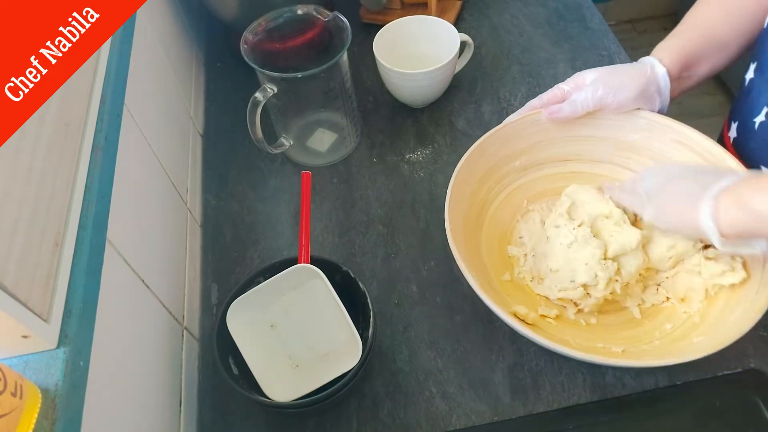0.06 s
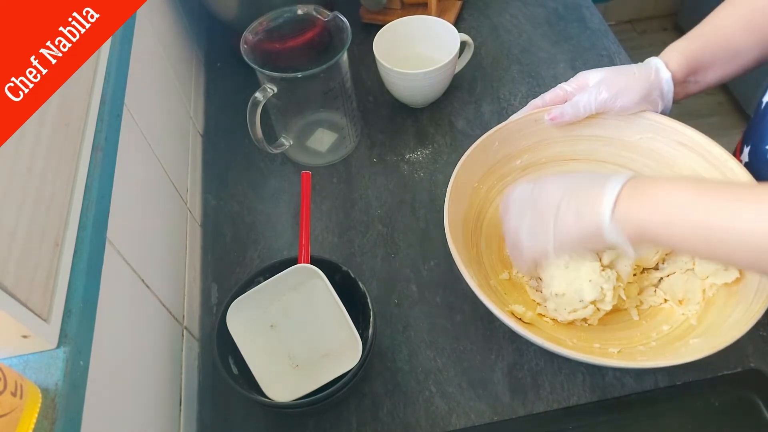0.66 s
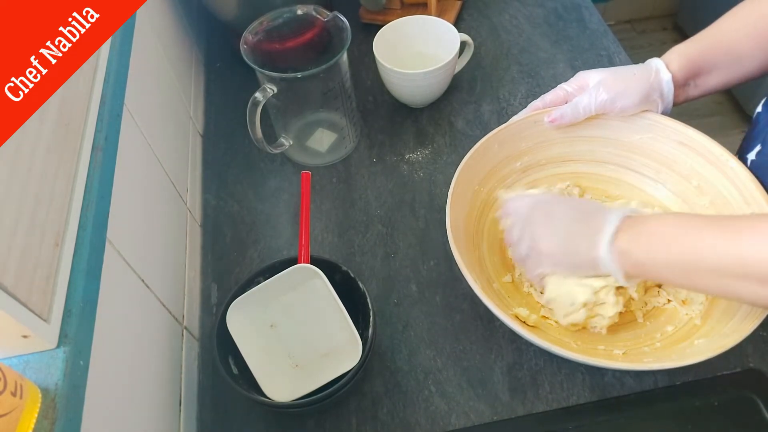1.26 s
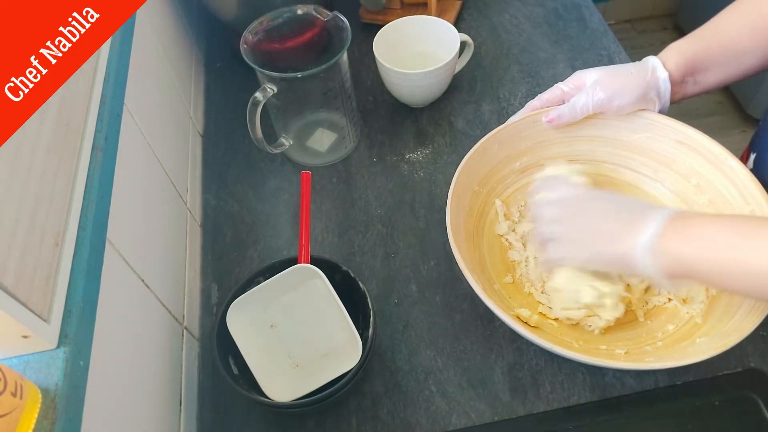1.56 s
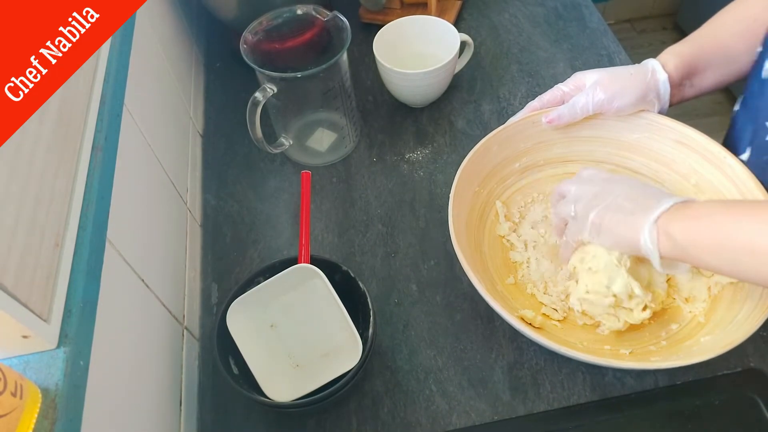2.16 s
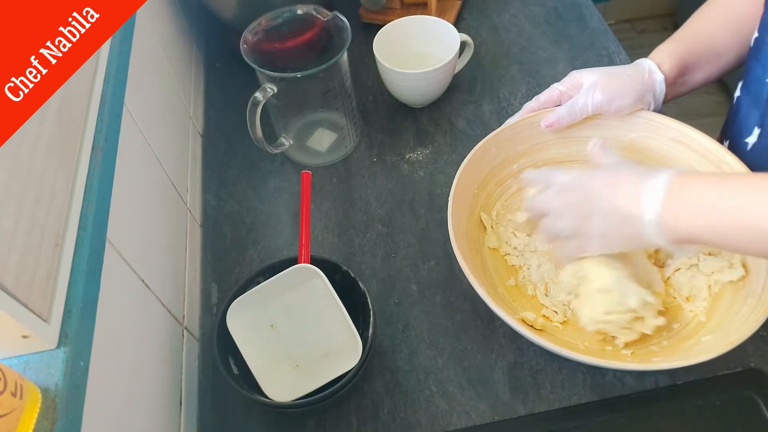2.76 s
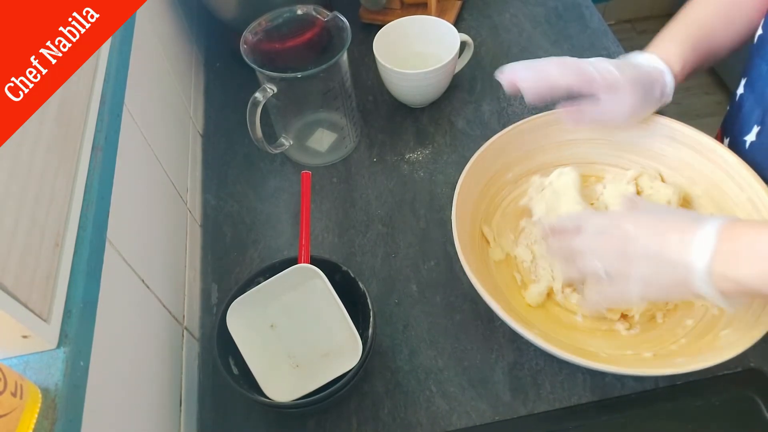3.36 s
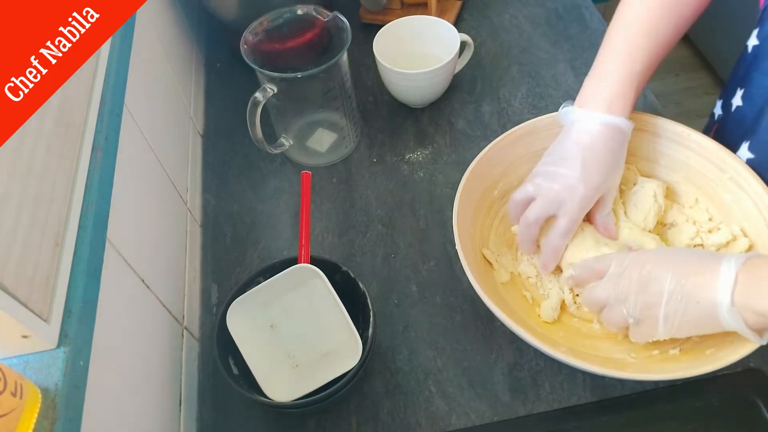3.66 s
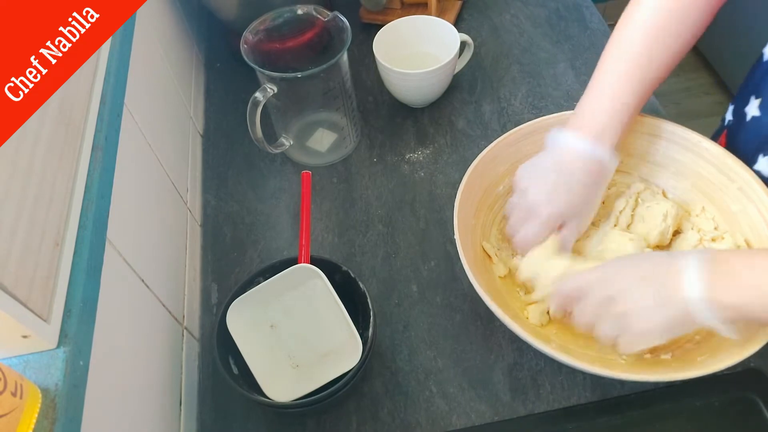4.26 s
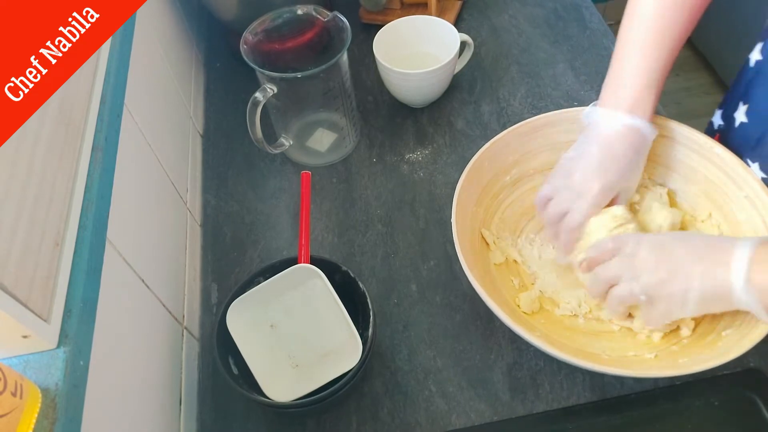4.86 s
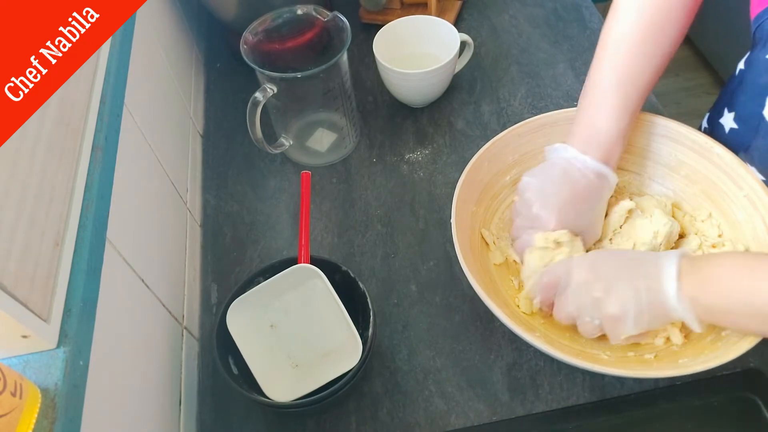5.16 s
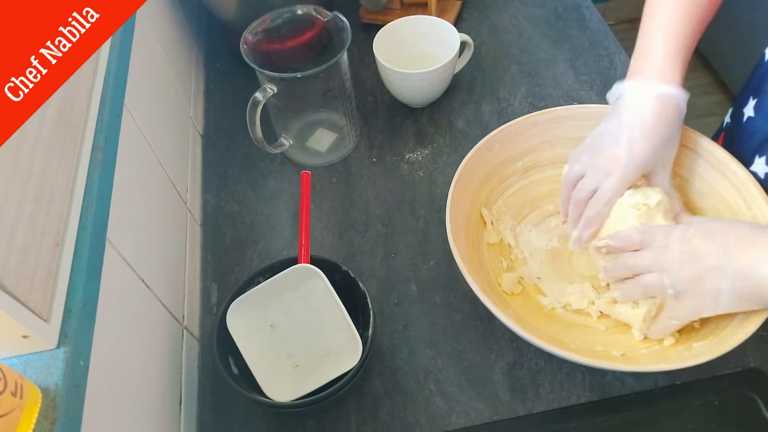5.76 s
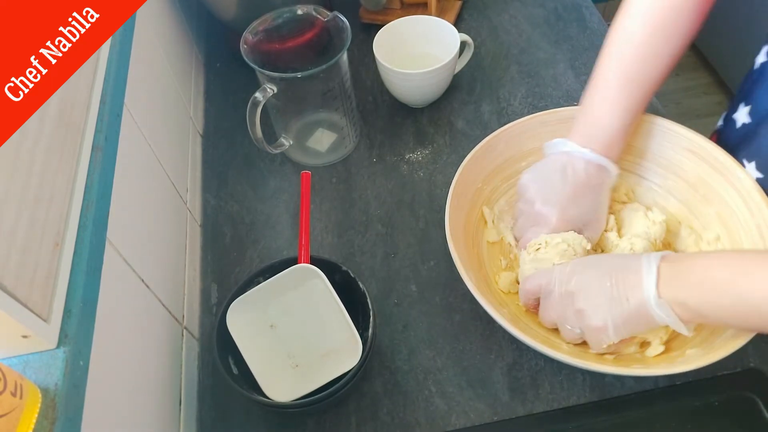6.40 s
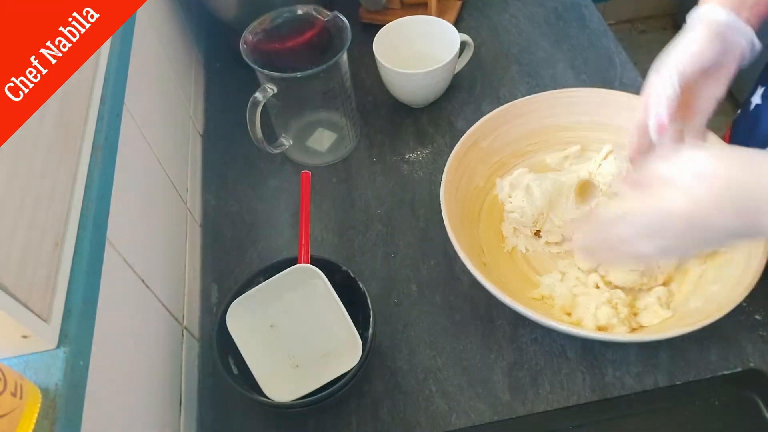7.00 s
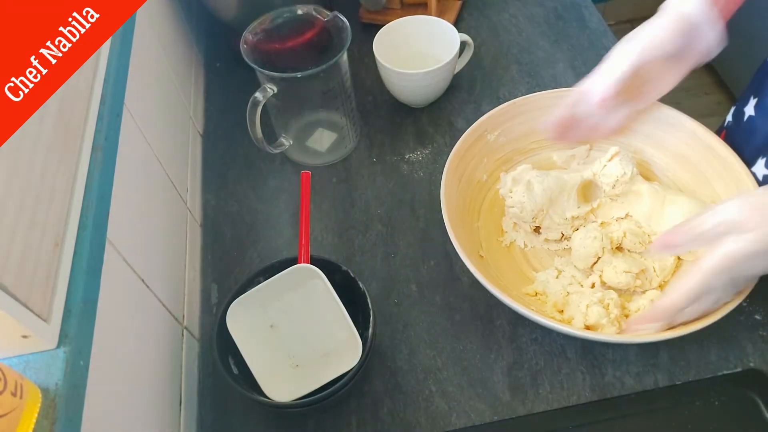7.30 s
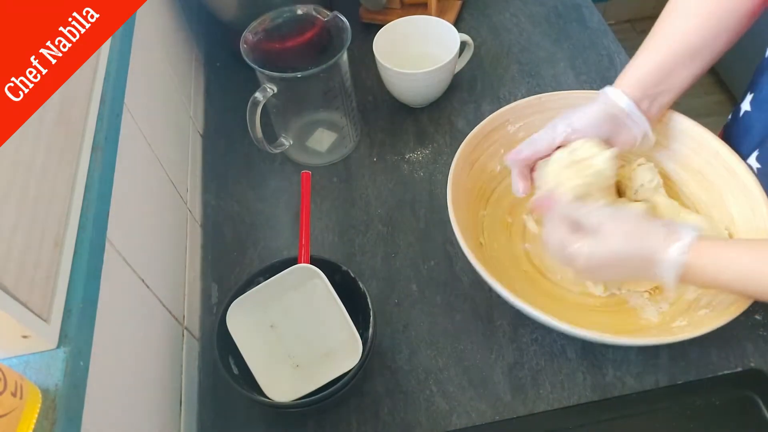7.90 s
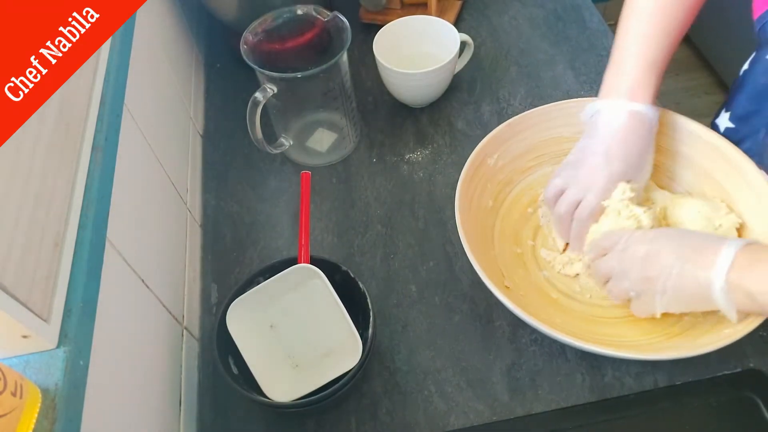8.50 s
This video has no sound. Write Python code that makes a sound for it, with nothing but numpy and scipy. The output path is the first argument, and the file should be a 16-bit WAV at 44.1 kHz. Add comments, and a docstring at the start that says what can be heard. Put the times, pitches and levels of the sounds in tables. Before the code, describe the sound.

Gloved hands knead damp dough in a wooden bowl, rubbing and squelching with dull thuds, and the bowl briefly rattles on the counter.

```python
"""Gloved hands knead a crumbly dough in a big wooden bowl on a kitchen counter.
Every push thuds through the bowl into the counter, with a short knock or click now and then.
The gloves rub, rustle and peel off the damp dough, which squelches under the palm.
Once the bowl tips, rumbles round on its foot and knocks back down.
The kitchen adds a short echo and a faint, steady background noise."""
import sys
import numpy as np
from scipy import signal
from scipy.fft import rfft, irfft, next_fast_len
from scipy.io import wavfile

SR = 44100
rng = np.random.default_rng(int(sys.argv[2]) if len(sys.argv) > 2 else 0)


def unload_audio(sound):
    """Save the sound as a 16-bit wav file, at the path given as the first command line argument."""
    columns = np.transpose(np.atleast_2d(sound))
    # keep every value between -1 and 1, then stretch to whole-number steps
    steps = np.round(np.clip(columns, -1, 1) * 32767)
    wavfile.write(sys.argv[1], SR, steps.astype(np.int16))


N = 385434

# Levels are set before the filters and the mix. t60 is the time a ring takes to fall by 60 dB.
# tone colours of four noises, from bass to treble: f/Hz, level/dB
ROOM_COLOUR = [(30, -15.5), (76, 12), (110, 6), (170, -8.5), (280, 1), (450, -3.5), (3000, -13.5),
               (15000, -55.5)]
RUB_COLOUR = [(120, -10.5), (300, -7), (580, -17), (830, -10), (1050, -8), (1600, -2), (2300, -4.5),
              (3000, -7), (4200, -7), (7000, -27)]
RUSTLE_COLOUR = [(300, -10), (1000, -7.5), (3000, -8), (4300, -1), (6500, -1.5), (7600, 3), (10000, -1),
                 (12000, -1), (15500, -12)]
RUMBLE_COLOUR = [(40, -11), (90, 5), (150, 2.5), (275, -1), (370, -8.5), (580, -20), (700, -13),
                 (800, -25.5), (980, -10.5), (1300, -25), (4000, -55.5), (15000, -82)]
# how long the kitchen echoes: f/Hz, t60/s
ROOM_DECAY = [(70, 0.48), (300, 0.46), (1000, 0.39), (4000, 0.34), (14000, 0.05)]
# how alike left and right are in spread-out sound: f/Hz, likeness (1 = the same)
STEREO_LIKENESS = [(100, 0.94), (280, 0.91), (550, 0.11), (2500, 0.046), (14000, 0.055)]
# echoes off the bowl's wall and the counter: delay/s, level/dB
CLOSE_ECHOES = [(.0019, -9), (.0031, -9), (.0046, -8), (.0063, -10)]
# ringing tones of bowl and counter giving way together: f/Hz, level/dB, t60/s
BODY_TONES = [(52.5, 5, 0.6), (77.5, -3, 0.51), (85, -6, 0.16), (123.3, -4, 0.51), (146.9, -5.5, 0.5),
              (211.3, -22, 0.6), (286.4, 3.5, 0.18), (305.6, -19, 0.2), (411, -10.5, 0.37)]
# ringing tones of the wooden shell: f/Hz, level/dB, t60/s
WOOD_TONES = [(728, -3, 0.2), (905, 7, 0.05), (790, -8, .06), (995, 10.5, 0.029), (1037, 11, 0.067),
              (1132, 8.5, 0.017), (1210, 11, 0.013), (1420, -2, 0.2), (1553, -3, 0.19), (1860, -2, 0.033),
              (2336, -8.5, 0.08), (2460, -11.5, 0.017)]
# ringing tones of the air between hands and bowl: f/Hz, level/dB, t60/s
AIR_TONES = [(1329, 1, 0.057), (1610, -8, 0.015), (1790, 0, .03), (2450, 6, 0.026), (2917, -2.5, 0.034)]
# a hand slides over dough and bowl: t/s, rise/s, hold/s, level/dB
HAND_SLIDES = [(0.0, 0.00033, 0.0076, -51.5), (.16, 0.22, 0.042, -50), (1.24, 0.064, 0.0091, -62.5),
               (1.48, 0.049, 0.0099, -52.5), (2.025, 0.0051, 0.043, -50.5), (2.16, 0.19, 0.15, -52.5),
               (2.57, 0.048, 0.085, -53), (2.937, 0.0059, 0.047, -57.5), (2.96, 0.077, 0.2, -49.5),
               (3.35, 0.012, 0.25, -62.5), (3.6, 0.16, 0.27, -55), (4.04, 0.21, 0.084, -60.5),
               (4.225, 0.019, 0.11, -52.5), (4.71, 0.19, 0.2, -57), (5.1, 0.071, 0.16, -61),
               (5.32, 0.1, 0.03, -48), (5.82, 0.24, 0.17, -57), (6.38, 0.047, 0.28, -56),
               (6.8, 0.08, 0.098, -46.5), (7.0, 0.058, 0.12, -57.5), (7.3, 0.065, 0.13, -50),
               (7.46, 0.05, 0.21, -52), (8.13, 0.11, 0.034, -60.5), (8.3, 0.36, 0.06, -63.5)]
# a glove creases as the fingers open or grip: t/s, hold/s, level/dB
GLOVE_CREASES = [(0.0, 0.092, -55), (0.206, 0.29, -56.5), (0.635, 0.19, -57), (1.15, 0.15, -60.5),
                 (1.45, 0.093, -54.5), (1.73, 0.18, -59), (2.99, 0.039, -50), (3.212, 0.05, -52),
                 (3.47, 0.18, -54.5), (3.906, 0.039, -52.5), (4.314, 0.08, -53), (4.45, 0.088, -60.5),
                 (4.599, 0.2, -55.5), (4.87, 0.19, -59), (5.49, 0.082, -58), (5.673, 0.11, -59.5),
                 (7.1, 0.06, -57), (7.23, 0.53, -58), (7.82, 0.51, -61), (8.4, 0.5, -63)]
# damp dough peels off the glove: t/s, rise/s, hold/s, level/dB
DOUGH_PEELS = [(4.27, 0.067, 0.066, -57), (7.23, 0.043, 0.14, -50.5), (8.03, 0.058, .11, -54)]
# sticky glove film snaps free: t/s, level/dB
GLOVE_SNAPS = [(1.530, -22.5), (2.016, -31), (2.942, -42), (3.489, -48), (4.317, -27), (5.406, -28),
               (5.449, -15)]
# squelches and squeaks under the palm: t/s, length/s, start f/Hz, end f/Hz, width/Hz, level/dB
PALM_SQUELCHES = [(0.838, 0.39, 1200, 1643, 200, -70.5), (1.471, 0.042, 2280, 2105, 520, -46.5),
                  (1.509, 0.04, 1966, 2080, 380, -42), (2.016, 0.086, 996, 854, 480, -46),
                  (2.605, 0.053, 945, 880, 260, -46.5), (2.634, 0.044, 2450, 2516, 710, -44.5),
                  (3.063, 0.19, 1456, 1926, 620, -45), (4.387, 0.093, 681, 654, 13, -55.5),
                  (5.351, 0.083, 1458, 1900, 1200, -45.5), (6.201, 0.1, 1500, 1097, 1060, -48)]
# short knocks and clicks from knuckles or the bowl's foot, and one wet pop: t/s, level/dB
SHORT_KNOCKS = [(1.529, -44), (2.040, -40.5), (2.945, -45.5), (3.358, -37), (4.231, -34.5), (4.309, -36),
                (4.77, -46), (7.402, -23.5), (8.175, -45)]
# the bowl is dragged and rolled on its foot: t/s, rise/s, hold/s, level/dB
BOWL_DRAGS = [(6.44, 0.07, 0.15, -43), (6.685, 0.041, 0.034, -33), (6.733, 0.008, 0.015, -20),
              (6.79, 0.026, 0.14, -30)]
# the tipped bowl's foot hits the counter: t/s, click level/dB, thud level/dB, bounce f/Hz
FOOT_HITS = [(6.735, -26.5, -25.5, 206), (6.744, -20, -12.5, 163), (6.833, -24.5, -15, 190),
             (6.841, -26, -10.5, 150), (6.868, -31, -18, 244), (6.907, -10.5, -9, 188),
             (6.937, -30.5, -16.5, 78), (6.986, -22, -21.5, 134), (7.024, -26.5, -19, 170),
             (7.058, -45, -17.5, 114), (7.105, -51, -24.5, 74.3)]
# the bowl shifts and settles under a push: t/s, level/dB, bounce f/Hz
BOWL_SETTLES = [(3.381, -30.5, 280), (7.432, -30, 282)]
# the hands lean steadily into the dough: t/s, rise/s, hold/s, level/dB
STEADY_PRESSES = [(0.15, 0.01, 0.03, -47.5), (2.94, 0.046, 0.081, -47), (3.38, 0.012, 0.028, -35.5),
                  (3.5, .02, 0.12, -52), (4.25, 0.018, 0.064, -35), (4.69, 0.044, 0.016, -42.5),
                  (5.74, 0.014, 0.027, -61), (8.175, 0.017, 0.04, -39.5)]
# the palm meets the dough, then the arm's weight follows:
# t/s, palm level/dB, palm bounce f/Hz, weight delay/s, weight level/dB
KNEADING_PUSHES = [(0.4, -37, 213, 0.027, -37.5), (1.41, -41, 166, 0.017, -31.5),
                   (2.035, -41, 140, 0.021, -38.5), (3.361, -25, 190, 0.022, -28.5),
                   (4.234, -19.5, 176, 0.02, -17), (4.732, -37.5, 164, 0.0085, -34.5),
                   (7.405, -21.5, 180, 0.0073, -22.5), (8.189, -45, 156, 0.055, -41.5)]


def from_db(db):
    """Turn decibels into a number to multiply by."""
    return 10 ** (np.asarray(db) / 20)


def rms_one(x):
    """Scale a sound so that its average strength (rms) is 1."""
    return x / np.sqrt(np.mean(x ** 2) + 1e-20)


def peaking_at(x, db):
    """Scale a sound so that its highest peak is at db."""
    return from_db(db) * x / np.abs(x).max()


def at_hz(points, hz):
    """Read between a table's rows, giving each octave equal room."""
    table_hz, values = np.transpose(points)
    return np.interp(np.log(hz + 1), np.log(table_hz), values)


def keep_band(x, hz, kind="low"):
    """Keep what lies below hz ("low") or above it ("high"), with a gentle edge."""
    return signal.sosfilt(signal.butter(2, min(hz, SR / 2 - 1), kind, fs=SR, output="sos"), x)


def add(out, start_s, sound):
    """Mix a sound in at its start time."""
    i = max(round(start_s * SR), 0)
    out[i:i + len(sound)] += sound[:N - i]


def drift(rate_hz):
    """A value that wanders at random around zero."""
    points = rng.standard_normal(N // 8)
    return np.interp(np.arange(N) * rate_hz / SR, np.arange(len(points)), points)


def burst(fade_s):
    """A crack of noise that dies away quickly."""
    t = np.arange(SR // 10) / SR
    return rng.standard_normal(len(t)) * np.exp(-t / fade_s)


def ringing(tones):
    """One fading sine wave for each ringing tone."""
    t = np.arange(SR * 2 // 3) / SR
    return np.array([from_db(db - 60 * t / t60) * np.sin(2 * np.pi * hz * t) for hz, db, t60 in tones])


def short_ring(tones):
    """The first tenth of a second of a ring, with every second tone flipped."""
    return (-1) ** np.arange(len(tones)) @ ringing(tones)[:, :SR // 10]


def movements(rows, fade_db_per_s=168.5):
    """Loudness over time of some movements: each speeds up evenly, holds and dies away."""
    t, power = np.arange(N) / SR, np.zeros(N)
    for start, rise, hold, db in rows:
        span = slice(max(int(start * SR), 0), int((start + 1) * SR))
        age = t[span] - start
        fade_db = fade_db_per_s * np.maximum(age - rise - hold, 0)
        power[span] += (np.clip(age / rise, 0, 1) * from_db(db - fade_db)) ** 2
    return np.sqrt(power)


def slips(per_s, spread_db, clump_db, clump_hz):
    """Friction is many tiny slips of uneven size that come in clumps."""
    sizes = from_db(spread_db * np.minimum(rng.exponential(1, (2, N)), 4)) * rng.standard_normal((2, N))
    slipping = rng.random((2, N)) < per_s / SR
    return sizes * slipping * from_db(clump_db * drift(clump_hz))


def diffuse(pair, colour):
    """Give two noises a tone colour and spread them out: centred in the bass, wide in the treble."""
    size = next_fast_len(pair.shape[1])
    hz = np.arange(size // 2 + 1) * SR / size
    mid, side = rfft(pair, size) * from_db(at_hz(colour, hz))
    alike = np.clip(at_hz(STEREO_LIKENESS, hz), -1, 1)
    left_right = np.sqrt(1 + alike) * mid + np.sqrt(1 - alike) * side * [[1], [-1]]
    return rms_one(irfft(left_right, size)[:, :pair.shape[1]])


def still_room():
    """The faint, low noise of the quiet kitchen."""
    return from_db(-66.0) * diffuse(rng.standard_normal((2, N)), ROOM_COLOUR)


def kitchen(x, echo_db, gap_s):
    """Add the room's echo, which starts after a gap and dies sooner in the treble."""
    t = np.arange(SR // 2) / SR
    spectrum = rfft(diffuse(rng.standard_normal((2, len(t))), [(1, 0), (SR, 0)]))
    hz = np.arange(spectrum.shape[1]) * SR / len(t)
    octave = np.round(np.log2(np.maximum(hz, 64)))
    tail = np.zeros((2, len(t)))
    for k in np.unique(octave):
        band = irfft(spectrum * (octave == k), len(t))
        tail += band * from_db(-60 * t / at_hz(ROOM_DECAY, 2 ** k))
    tail *= t > gap_s
    tail /= np.sqrt(np.sum(tail ** 2) / 2)
    return x + from_db(echo_db) * signal.fftconvolve(x[None], tail, axes=1)[:, :N]


def from_right(pair, left_lag_s=7e-5):
    """The bowl stands to the right, so its sound reaches the left side later."""
    n = np.arange(N)
    return np.array([np.interp(n - left_lag_s * SR, n, pair[0]), pair[1]])


def close_echoes(pair, sway_s=.00012, sway_hz=2.5):
    """Echoes off bowl and counter colour the sound, and shift as the hands move."""
    n, out, dull = np.arange(N), pair.copy(), keep_band(pair, 4500)
    for delay_s, db in CLOSE_ECHOES:
        for side in range(2):
            lag = (delay_s * rng.uniform(.9, 1.1) + sway_s * drift(sway_hz)) * SR
            out[side] += from_db(db) * np.interp(n - lag, n, dull[side])
    return out


def in_bowl(pair, tones, ring_db):
    """The bowl rings along with the friction."""
    ring = short_ring(tones)
    ring /= np.linalg.norm(ring)
    return pair + from_db(ring_db) * signal.fftconvolve(pair, ring[None], axes=1)[:, :N]


def rubbing(sliding, resting_db=-81.5):
    """Coarse slips ring the wood; sticky ones ring the air between hands and bowl."""
    coarse = slips(per_s=4000, spread_db=0.0, clump_db=1.0, clump_hz=91.7)
    sticky = slips(per_s=990, spread_db=0.5, clump_db=2.5, clump_hz=41.6)
    wood = in_bowl(coarse, WOOD_TONES, ring_db=-23.5)
    air = signal.fftconvolve(sticky, short_ring(AIR_TONES)[None], axes=1)[:, :N]
    gain = np.hypot(sliding, from_db(resting_db))   # the hands never lie quite still
    return gain * (diffuse(wood, RUB_COLOUR) + from_db(-9.0) * diffuse(air, RUB_COLOUR))


def crackles(per_s=24, spread_db=4.0):
    """Specks of dough let go of the glove at random, each with a tiny tick."""
    starts = rng.random(N) < per_s / SR
    sizes = from_db(spread_db * np.minimum(rng.exponential(1, N), 3))
    ticks = signal.fftconvolve(starts * sizes, burst(0.00065))[:N]
    return diffuse(kitchen(ticks, echo_db=1.5, gap_s=0.00073), RUSTLE_COLOUR)


def crinkles(per_s=21, fade_s=.018, depth=.45):
    """Loudness over time of the glove film's little spurts: each starts at once and fades."""
    starts = (rng.random(N) < per_s / SR) * np.minimum(rng.exponential(1, N), 2)
    spurts = signal.lfilter([1], [1, -np.exp(-1 / (fade_s * SR))], starts)
    return rms_one(1 + depth * spurts)


def brighter_when_fast(pair, gain, neutral_db=-72.0, edge_hz=15400):
    """The faster the glove moves, the more top treble it has."""
    top = keep_band(pair, edge_hz, "high")
    top = keep_band(top[:, ::-1], edge_hz, "high")[:, ::-1]   # a backward pass undoes the filter's delay
    return pair + ((gain / from_db(neutral_db)) ** 0.48 - 1) * top


def peeling(fine_slips, edge_hz=6700):
    """Damp dough peels off the glove with a high fizz."""
    noise = diffuse(fine_slips[::-1, ::-1], RUSTLE_COLOUR)   # reversed, so it is unlike the rustle
    return movements(DOUGH_PEELS) * rms_one(keep_band(noise, edge_hz, "high"))


def gloves(sliding, crease_rise_s=.018, resting_db=-68.5):
    """Fine slips in the glove film rustle as it slides, creases and peels."""
    creasing = movements([(start, crease_rise_s, hold, db) for start, hold, db in GLOVE_CREASES])
    moving = np.hypot(from_db(-1.46) * sliding, creasing)
    gain = np.hypot(moving, from_db(resting_db))
    fine = slips(per_s=36000, spread_db=-0.5, clump_db=0.5, clump_hz=33.7)
    rustle = diffuse(fine, RUSTLE_COLOUR) + from_db(-7.5) * crackles()
    rustle = gain * brighter_when_fast(rustle, gain)
    return crinkles() * (rustle + peeling(fine))


def hands():
    """The same slides rub the dough and rustle the gloves, close to the bowl's wall."""
    sliding = movements(HAND_SLIDES)
    return from_db(-0.6) * close_echoes(rubbing(sliding) + gloves(sliding))


def squelches():
    """Air and wet dough squeeze through a gap whose pitch glides as the palm moves."""
    out = np.zeros(N)
    for start, length, start_hz, end_hz, width_hz, db in PALM_SQUELCHES:
        size = int(length * SR)
        flutter = keep_band(rng.standard_normal((2, SR)), width_hz / 2)[:, -size:]
        phase = 2 * np.pi * np.cumsum(np.linspace(start_hz, end_hz, size)) / SR
        rough_tone = rms_one(flutter[0] * np.cos(phase) + flutter[1] * np.sin(phase))
        swell = np.sin(np.linspace(0, np.pi, size))
        add(out, start, from_db(db) * rough_tone * swell)
    return out


def snaps(fade_s=0.0011, low_hz=2000, high_hz=12500):
    """Thin film lets go of the dough with a small, bright tick."""
    out = np.zeros(N)
    for start, db in GLOVE_SNAPS:
        tick = keep_band(burst(fade_s), low_hz, "high")
        add(out, start, peaking_at(keep_band(tick, high_hz), db))
    return out


def knocks(vary_db=3.0, damping_s=.013, lasting_db=-9.0):
    """Each knock, click or pop is a short crack and a wooden ring that the hands soon damp."""
    out, tones = np.zeros(N), ringing(WOOD_TONES)
    t = np.arange(tones.shape[1]) / SR
    damping = np.exp(-t / damping_s) + from_db(lasting_db)
    foot_clicks = [(start, db) for start, db, _, _ in FOOT_HITS]
    for start, db in SHORT_KNOCKS + foot_clicks:
        # each spot on the bowl rings with its own mix of tones
        mix = rng.choice([-1, 1], len(tones)) * from_db(vary_db * rng.standard_normal(len(tones)))
        blow = peaking_at(mix @ tones * damping, 0)
        top_hz = 3020 * from_db(.22 * db)   # a harder blow is brighter
        crack = keep_band(keep_band(burst(0.007), top_hz), 820, "high")
        add(blow, 0, peaking_at(crack, -5.5))
        add(out, start, peaking_at(blow, db))
    return out


def thuds(loads, cycles, ring_db, crush_db, detune=0.016, vary_db=4, mute_s=1.3):
    """Each load (t/s, level/dB, f/Hz) swells, bounces briefly and sets bowl and counter ringing."""
    out = np.zeros(N)
    for start, db, bounce_hz in loads:
        # the ring shifts with where the dough and the hands lie
        shifts = rng.standard_normal((len(BODY_TONES), 2))
        tones = [(hz * (1 + detune * pitch_shift), level + vary_db * level_shift, t60)
                 for (hz, level, t60), (pitch_shift, level_shift) in zip(BODY_TONES, shifts)]
        body = ringing(tones).sum(axis=0)
        t = np.arange(len(body)) / SR
        turns = bounce_hz * t
        swell = turns ** 2.55 * np.exp(-turns / cycles)   # a higher power starts more gently
        force = peaking_at(swell * np.sin(2 * np.pi * turns), 0)
        # crumbling lumps add a rough noise above the bounce
        crush = keep_band(burst(.028), 1.53 * bounce_hz)
        add(force, 0, peaking_at(keep_band(crush, 230, "high"), crush_db))
        ring = signal.fftconvolve(np.gradient(force), body)[:len(t)]
        # after a light push the hand stays on the dough and mutes the ring sooner
        ring *= np.exp(-t / (mute_s * np.sqrt(from_db(db))))
        add(out, start, peaking_at(force + peaking_at(ring, ring_db), db))
    return out


def rolling():
    """The foot judders over the counter as the bowl is dragged round."""
    judder = slips(per_s=2700, spread_db=0.5, clump_db=4.5, clump_hz=69.3)
    return movements(BOWL_DRAGS) * diffuse(judder, RUMBLE_COLOUR)


def foot_thuds(lag_s=0.00186):
    """Just after each click of the foot, the tipped bowl's weight lands; it hardly rings."""
    landings = [(start + lag_s, db, hz) for start, _, db, hz in FOOT_HITS]
    return thuds(landings, cycles=0.5, ring_db=-7.5, crush_db=-12.5)


def pressing():
    """Dough gives way lump by lump under a steady press, with a dull rumble in the bowl."""
    lumps = slips(per_s=1400, spread_db=-0.5, clump_db=7.0, clump_hz=39.7)
    rumble = keep_band(in_bowl(lumps, BODY_TONES, ring_db=-17.0), 460)
    return movements(STEADY_PRESSES) * diffuse(rumble, RUMBLE_COLOUR)


def pushes(weight_bounce_hz=80):
    """The palm gives a short bump; the arm's weight then bounces the bowl on the counter."""
    palms = [(start, db, hz) for start, db, hz, _, _ in KNEADING_PUSHES]
    weights = [(start + delay, db, weight_bounce_hz) for start, _, _, delay, db in KNEADING_PUSHES]
    bumps = thuds(palms + BOWL_SETTLES, cycles=0.35, ring_db=-2.5, crush_db=-8)
    bounces = thuds(weights, cycles=0.51, ring_db=-1.0, crush_db=-13.5)
    return keep_band(bumps + bounces, 436)   # the soft dough dulls both


def scene():
    """Mix the kneading, a little to the right, with the quiet kitchen."""
    bowl = kitchen(pushes() + foot_thuds(), echo_db=-9.0, gap_s=0.0066) + pressing() + rolling()
    wood = kitchen(knocks(), echo_db=-7, gap_s=.008)
    sticky = from_db(-7.0) * kitchen(squelches() + snaps(), echo_db=-5.0, gap_s=0.0051)
    mix = still_room() + hands() + from_right(bowl + wood + sticky)
    return keep_band(mix, 30, "high") * from_db([[-1.1], [1.0]])   # left, right


def record(dry, cutoff_hz=15750):
    """Cut off the highest treble steeply."""
    return signal.sosfilt(signal.ellip(10, .2, 70, cutoff_hz, fs=SR, output="sos"), dry)


dry = scene()
out = record(dry)
unload_audio(out)
```